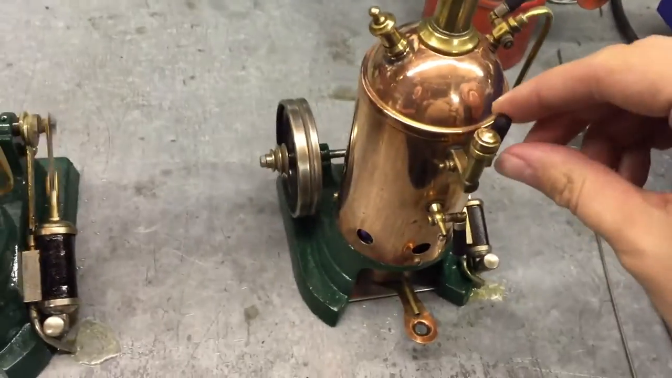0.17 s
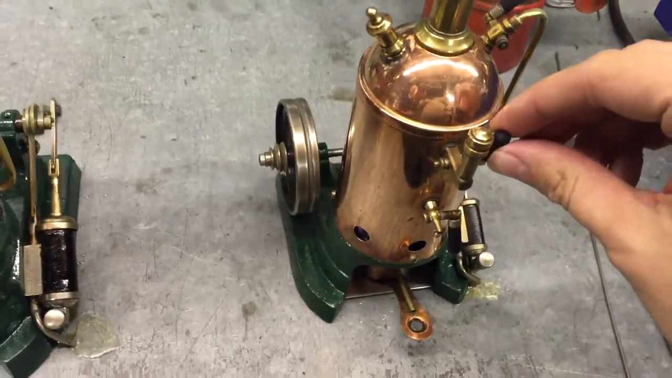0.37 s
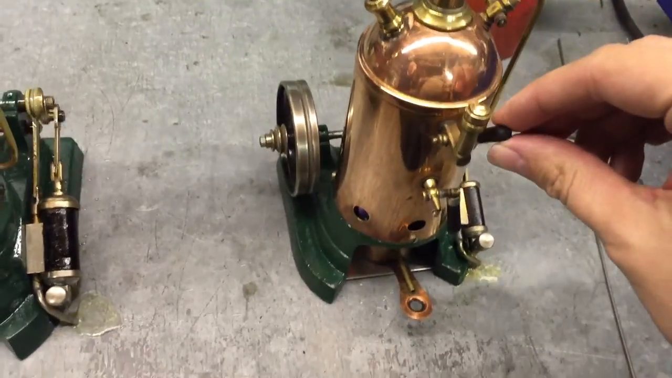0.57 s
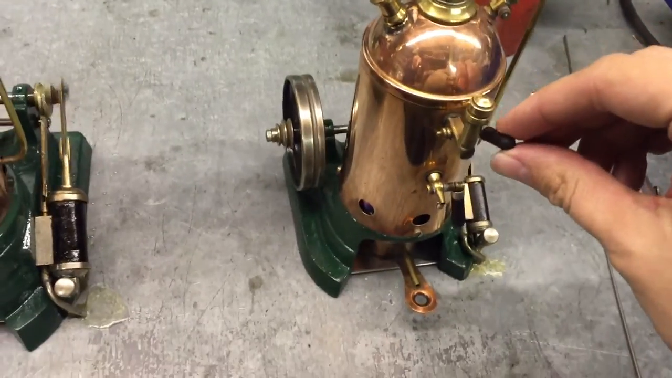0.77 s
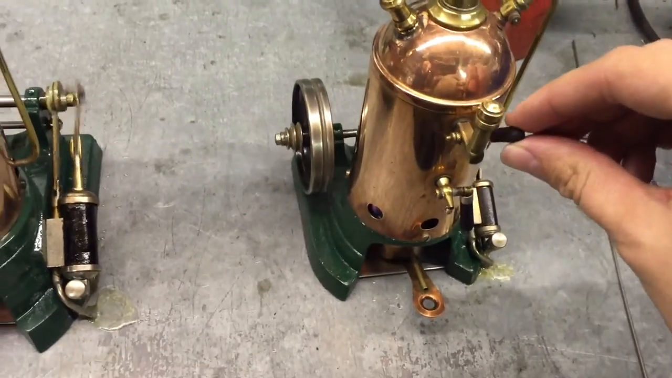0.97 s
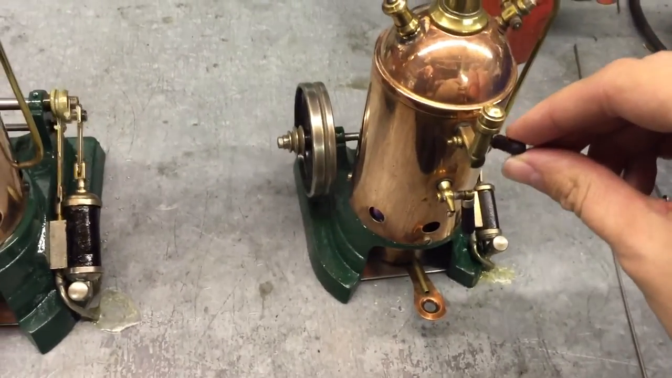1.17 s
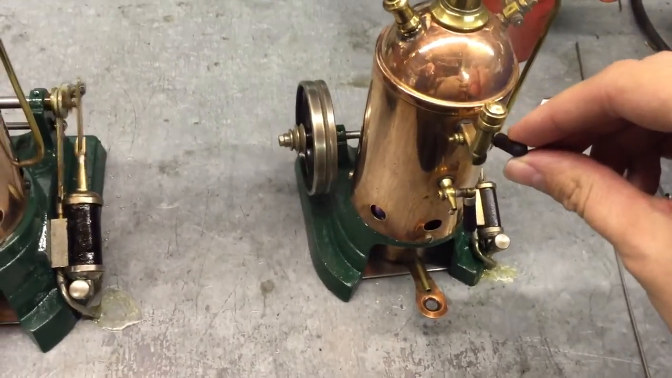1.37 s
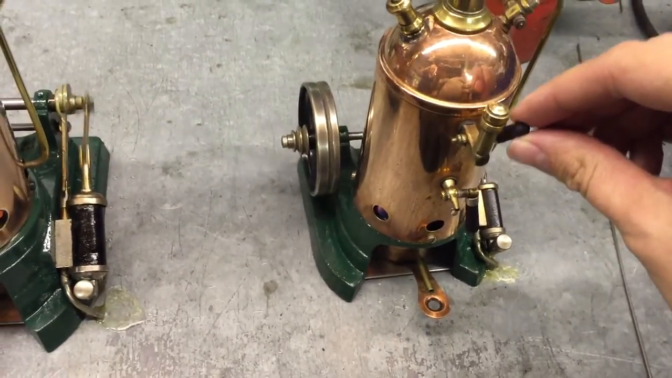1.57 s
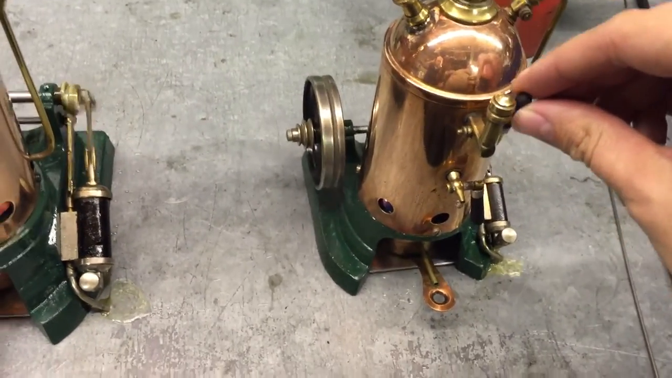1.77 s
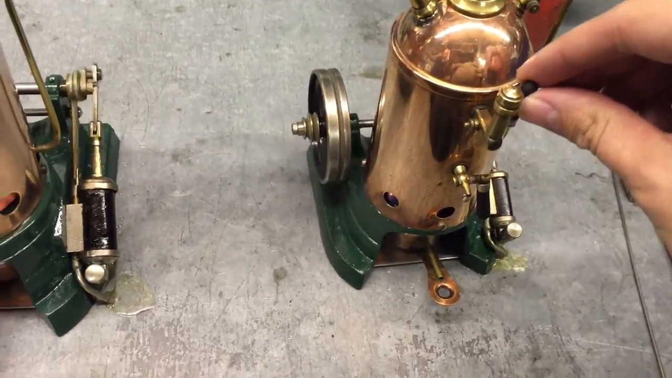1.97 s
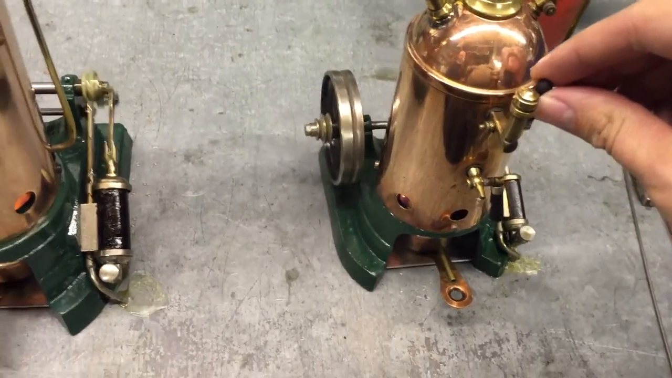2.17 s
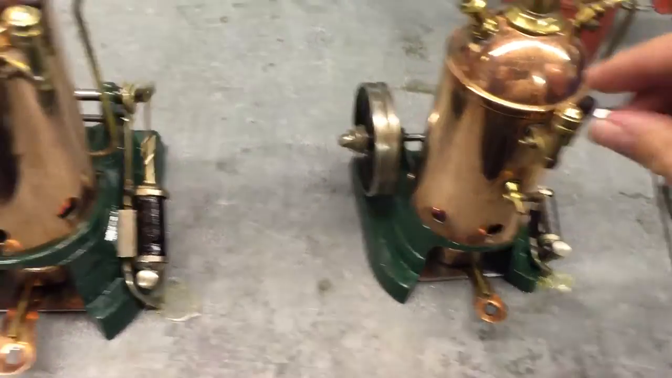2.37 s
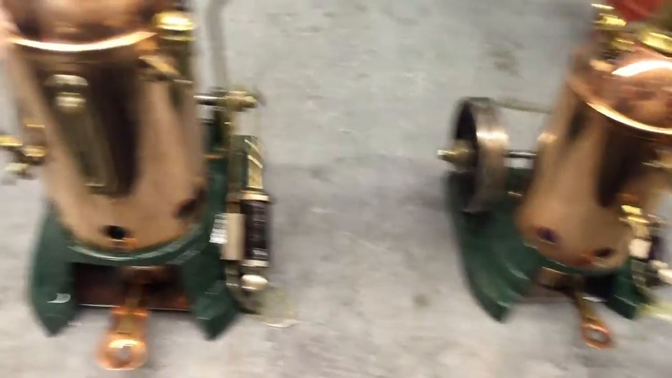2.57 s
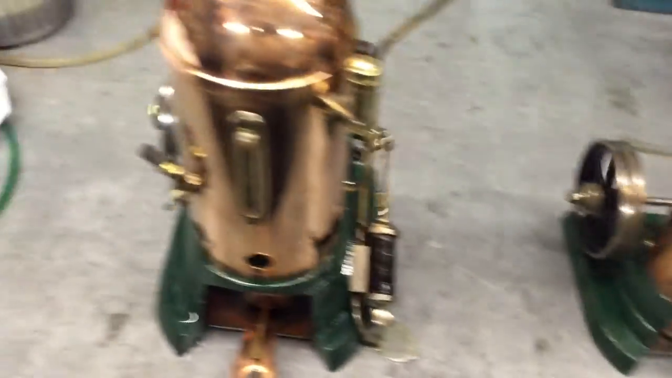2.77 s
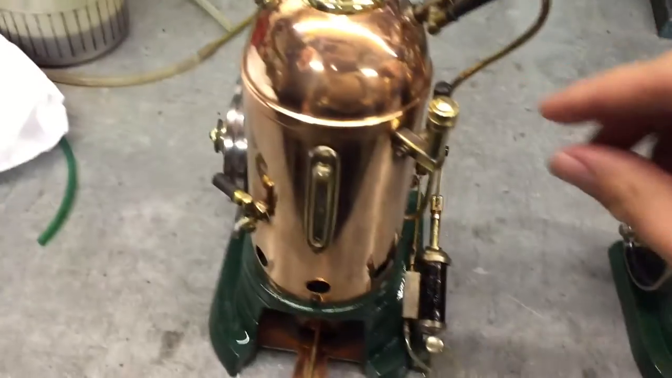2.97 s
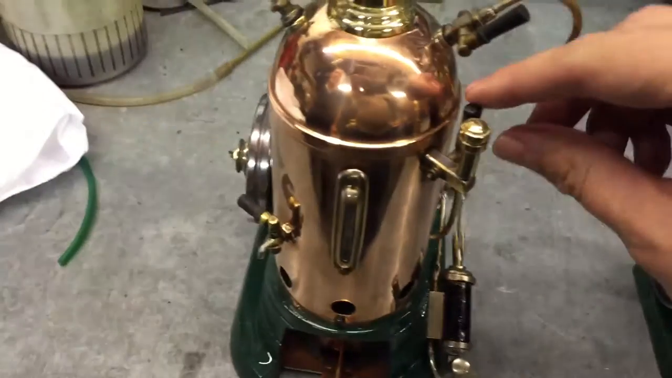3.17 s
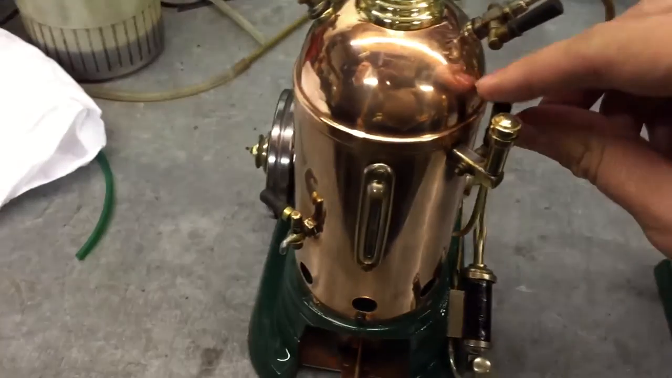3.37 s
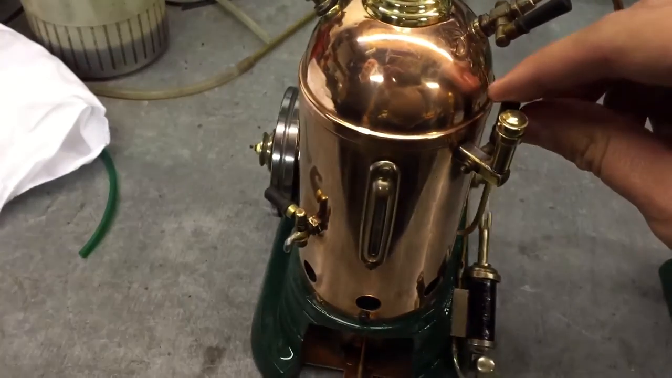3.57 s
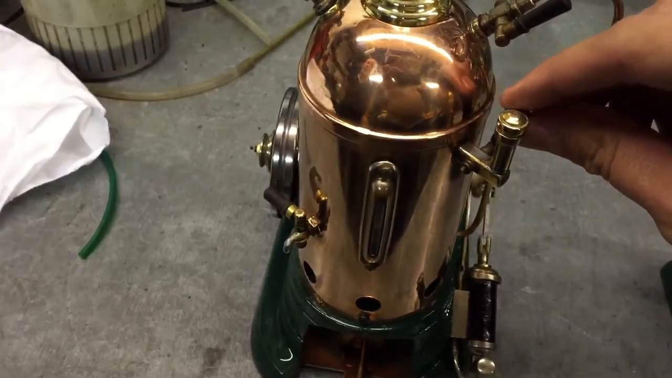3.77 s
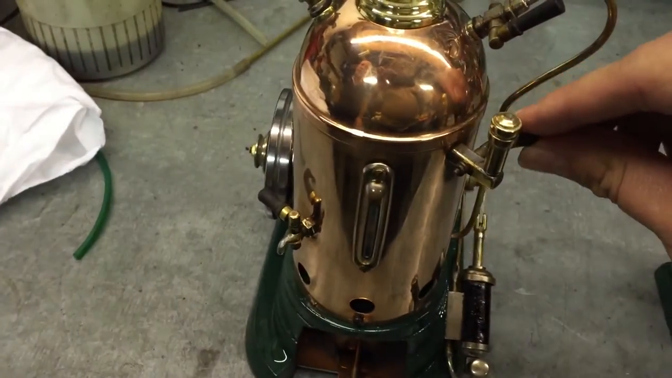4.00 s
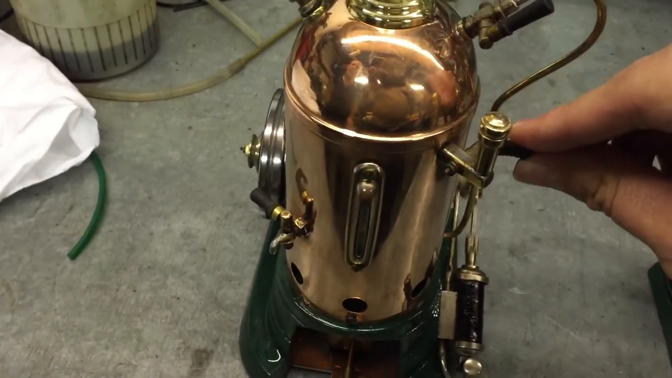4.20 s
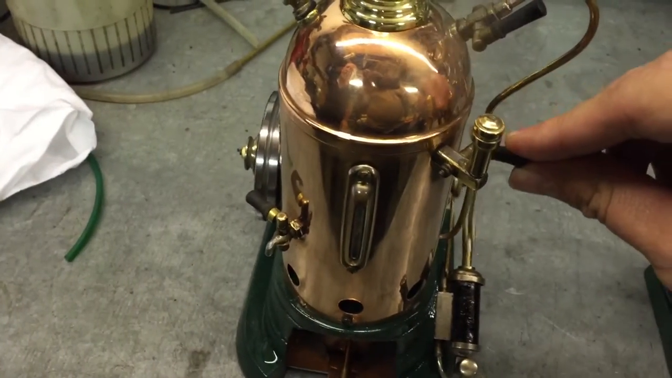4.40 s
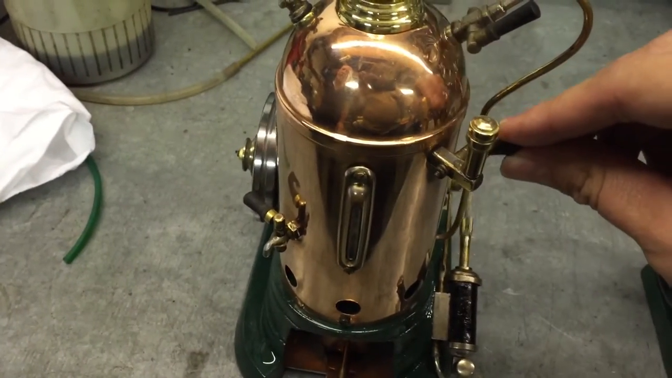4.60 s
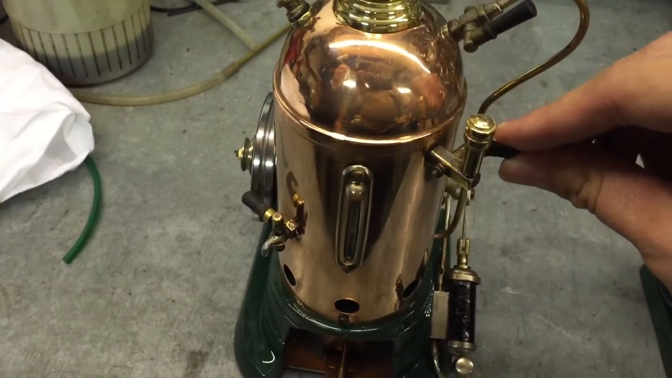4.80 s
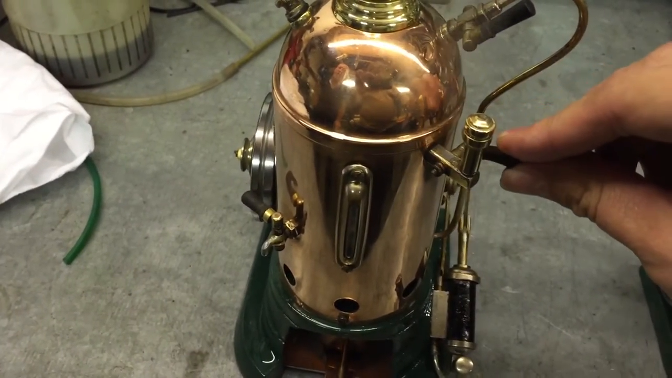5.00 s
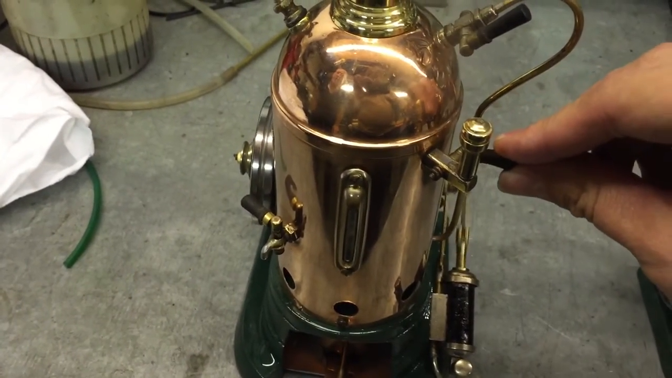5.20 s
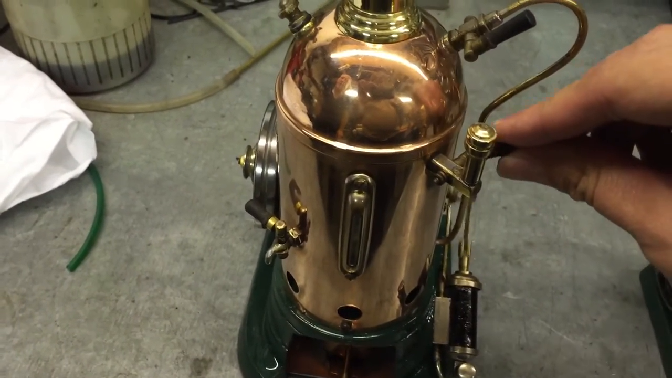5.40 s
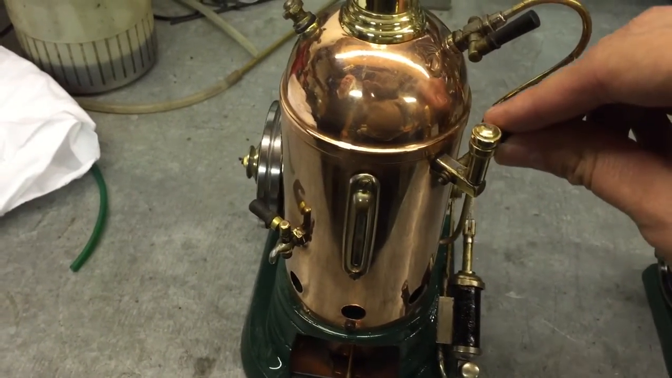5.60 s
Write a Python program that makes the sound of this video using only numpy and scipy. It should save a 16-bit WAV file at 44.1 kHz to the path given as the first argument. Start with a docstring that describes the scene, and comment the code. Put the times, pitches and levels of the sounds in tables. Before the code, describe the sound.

Close handheld phone sound of two tiny steam engines on a workshop floor: light chuffs, metal clacks, rattles, boiler simmer and airy burner hiss. Two brief piercing whistle blasts come first, then engine noise alone, then two higher, rougher blasts with steam spray and low buffeting. The background dips under the whistles and swells back; reflections are short.

```python
"""Two small model steam engines run on a workshop floor near a phone; a hand opens the whistle of one twice,
then of the other twice. Whistles are wavering sines with steam hiss around them. Each crank turn of the first
engine gives a noise puff and a clack of ringing metal; the second puffs softly. Loose parts knock and water
simmers over steady workshop noise. The phone's gain control turns the room down under the whistles and
brings it back slowly."""
import sys
import numpy as np
from scipy import signal
from scipy.fft import rfft, irfft
from scipy.io import wavfile
from scipy.ndimage import uniform_filter1d

SR = 44100
rng = np.random.default_rng(int(sys.argv[2]) if len(sys.argv) > 2 else 0)


def put_to_file(sound):
    """Save the sound as 16-bit audio at rate SR, in the file named by the first command-line argument."""
    columns = np.atleast_2d(sound).T  # one column per channel
    safe = np.clip(columns, -1, 1)
    whole_steps = np.round(safe * 32767)
    wavfile.write(sys.argv[1], SR, whole_steps.astype(np.int16))


N = 249165
TIME = np.arange(N) / SR
LIFT_DB = 11  # how far the gain control lifts quiet passages

# crank turns of the first engine: (time [s], puff level [dB], delay of the clack [ms], clack level [dB],
# level of the knock that comes with the clack [dB])
CRANK_TURNS = [(0.059, -35.5, 65.3, -31.5, -42), (0.2404, -34, 72.5, -35, -33),
               (0.4215, -37.5, 74, -33, -32), (0.611, -35, 68, -34, -29), (1.1594, -33.5, 73, -29, -20.5),
               (1.7146, -35.5, 66.5, -31.5, -27.5), (1.8928, -33, 64, -28.5, -24.5),
               (2.0755, -33.5, 66, -33, -24), (2.2568, -35, 63.7, -34.5, -24.5),
               (2.4369, -35.5, 67.5, -32, -29), (2.612, -36.5, 74.7, -32.5, -30),
               (2.7967, -41.5, 67, -28.5, -28), (2.978, -38.5, 67.4, -29, -31), (3.16, -38, 62, -38, -32),
               (3.3428, -33.5, 74.5, -35, -29), (3.521, -41.5, 68, -43, -32),
               (3.705, -40.5, 55, -41.5, -35), (3.8818, -42.5, 70, -48, -26),
               (4.0676, -40.5, 67.5, -34.5, -31), (4.2545, -41.5, 58, -52, -40),
               (4.8174, -37, 60, -38, -26.5), (5.579, -39.5, 64, -43, -42.5)]
# ringing tones of the metal base: (frequency [Hz], level [dB], time to fall by 60 dB [s])
BASE_MODES = [(866, -17.5, 0.19), (1221, -3, 0.03), (1366, -8.5, .02), (1600, -2, 0.012),
              (2041, -7.5, 0.026), (2515, 2, 0.0074), (2950, -4, 0.0028)]


def undb(db):
    """Turn decibels into an amplitude factor."""
    return 10 ** (np.asarray(db) / 20)


def unit(x):
    """Scale a signal to rms 1."""
    return x / np.sqrt(np.mean(x ** 2))


def svf(x, hz, width):
    """One resonance, gain 1 at the centre."""
    return signal.lfilter(*signal.iirpeak(hz, hz / width, fs=SR), x)


def follow(x, rise_s, fall_s, size=100):
    """Envelope that rises and falls at its own rates, worked out block by block."""
    held = [0.]
    for value in x[::size]:
        lag_s = rise_s if value > held[-1] else fall_s
        held.append(held[-1] + (value - held[-1]) * size / SR / lag_s)
    return np.interp(np.arange(N), np.arange(len(held)) * size, held)


def band(hz, width):
    """Noise in one resonance, rms 1."""
    return unit(svf(rng.standard_normal(N), hz, width))


def coloured(points):
    """Noise with a spectrum drawn through (Hz, dB) points, rms 1."""
    hz, db = np.transpose(points)
    bins = np.arange(1, N // 2 + 2) * SR / N
    gain = undb(np.interp(np.log(bins), np.log(hz), db))
    return unit(irfft(rfft(rng.standard_normal(N)) * gain, N))


def walk(rate):
    """Smooth random wander that changes about rate times a second, rms 1."""
    lowpass = signal.butter(2, rate, fs=SR, output="sos")
    return unit(signal.sosfilt(lowpass, rng.standard_normal(N)))


def played(tables):
    """Columns of several spans against time, and a gate open inside the spans."""
    s, *columns = np.transpose(np.concatenate(tables))
    gate = sum((TIME >= t[0][0]) & (TIME <= t[-1][0]) for t in tables)
    return uniform_filter1d(1. * gate, size=60), [np.interp(TIME, s, c) for c in columns]


def bursts(s, db, rise_s, t60):
    """An envelope that swells and dies at each event."""
    t = np.arange(int(SR / 5)) / SR
    shape = (1 - np.exp(-t / rise_s)) ** 2 * undb(-60 * t / t60)
    marks = np.zeros(N)
    marks[(s * SR).astype(int)] = undb(db)
    return signal.oaconvolve(marks, shape / shape.max())[:N]


def ring(x, modes, tilt_db):
    """Fading sines rung by x; tilt_db per octave favours the high ones, or the low ones if negative."""
    t = np.arange(int(SR / 5)) / SR
    body = 0
    for hz, db, t60 in modes:
        fade = undb(db + tilt_db * np.log2(hz / 1700) - 60 * t / t60)
        body = body + fade * np.sin(2 * np.pi * hz * t)
    return signal.fftconvolve(x, body)[:N]


def room(x, t60, wet_db):
    """Reflections add a short tail of fading noise."""
    t = np.arange(int(SR / 2)) / SR
    tail = rng.standard_normal(len(t)) * undb(-60 * t / t60) * (t > .004)
    return x + undb(wet_db) * signal.fftconvolve(x, tail / np.sqrt(np.sum(tail ** 2)))[:N]


def workshop_hiss():
    """Steady noise with burner and leaks, cut into bands that flicker on their own."""
    # spectrum of the noise: (frequency [Hz], relative level per Hz [dB])
    spectrum = [(60, -12.5), (110, -8), (220, -15), (326, -7.5), (450, -24.5), (596, -4), (981, -10.5),
                (1210, -8), (1840, -10.5), (3000, -14), (5250, -13.5), (7580, -13.5), (9000, -11.5),
                (11500, -16.5), (13600, -15), (15800, -21.5)]
    noise = coloured(spectrum)
    edges = (60, 400, 1500, 3200, 5500, 7600, 10400, 12500, 16500)  # Hz
    hiss = 0
    for low_hz, high_hz in zip(edges, edges[1:]):
        bandpass = signal.butter(3, (low_hz, high_hz), "band", fs=SR, output="sos")
        flicker_db = 1.6 * np.tanh(walk(22) / 2) + 3.0 * walk(4)
        hiss = hiss + signal.sosfilt(bandpass, noise) * undb(flicker_db)
    return undb(-51.5) * hiss


def deep_rumble():
    """Narrow low noise that swells now and then over a faint steady level."""
    # swells: (centre [s], level [dB], length [s])
    swell_table = [(0.115, -57.5, .1), (0.447, -61.5, 0.27), (2.27, -72, 0.13), (2.57, -65, .12),
                   (2.95, -67.5, 0.34), (3.35, -63, .3), (4.054, -63, .35)]
    swells = undb(-71)
    for s, db, length in swell_table:
        swells = swells + undb(db) * np.exp(-(2 * (TIME - s) / length) ** 2)
    return swells * unit(svf(band(58, 27), 48, 35))


def dull_thumps():
    """Thumps near the phone: short bursts of low noise."""
    # (time [s], level [dB])
    thump_table = [(0.349, -43.5), (0.521, -44), (0.628, -52)]
    s, db = np.transpose(thump_table)
    return bursts(s, db - 8.0, 0.0026, 0.146) * (band(84, 44) + band(370, 95))


def simmering():
    """Boiler water stirs each mode of the metal on its own, in short uneven fits."""
    # the simmering swells and sinks: (time [s], level [dB])
    swell_table = [(0, -53), (.7, -49), (2.0, -49), (2.9, -51), (3.8, -56), (4.8, -49.5), (5.65, -63)]
    chatter = 0
    for mode in BASE_MODES:
        fits_db = 15 * np.tanh(walk(33) / 2) + 4.32 * walk(140)
        chatter = chatter + ring(rng.standard_normal(N) * undb(fits_db), [mode], 0)
    return undb(np.interp(TIME, *np.transpose(swell_table))) * unit(chatter)


def exhaust_puffs():
    """Each puff is a quick burst of pipe-coloured noise and a slower burst of broad hiss."""
    # broad hiss: (frequency [Hz], relative level per Hz [dB])
    puff_spectrum = [(900, -13), (2000, -1), (5000, -2), (8500, -5.5), (11500, -11), (13500, -7.5),
                     (15500, -5)]
    # resonances of the exhaust: (frequency [Hz], width [Hz], relative level [dB])
    pipe_modes = [(9470, 900, 8.5), (8800, 170, -5.5), (13400, 1500, -14.5)]
    turn_s, puff_db, *_ = np.transpose(CRANK_TURNS)
    # the second engine puffs softly and evenly, weaker until the phone comes nearer
    second_s = 3.091 + .147 * np.arange(-20, 17)
    phone_moves_s, phone_arrives_s, far_db = 1.2, 3.1, -8
    distance_db = np.interp(second_s, (phone_moves_s, phone_arrives_s), (far_db, 0))
    second_db = -44.5 + distance_db + 2 * rng.standard_normal(len(second_s))
    s = np.r_[turn_s, second_s]
    db = np.r_[puff_db, second_db]
    broad_db = np.r_[puff_db - 4, second_db - 0.5]
    pipe = unit(sum(undb(d) * band(f, w) for f, w, d in pipe_modes))
    quick = bursts(s - .005, db - 4, 0.0036, 0.033) * pipe
    slow = bursts(s - .006, broad_db - 2.5, 0.032, 0.066)
    return quick + slow * coloured(puff_spectrum) * undb(2.0 * walk(200))


def loose_knocks(rattle):
    """Loose parts hit the base: short rattles ring its modes."""
    # (time [s], level [dB])
    knock_table = [(0.058, -28), (0.112, -31), (0.613, -37), (0.628, -25.5), (1.626, -25), (1.773, -22),
                   (1.919, -26), (2.081, -38), (2.161, -39.5), (2.248, -35), (2.488, -31), (2.642, -23.5),
                   (2.667, -26.5), (2.926, -27), (3.016, -34), (3.343, -28), (3.52, -22.5), (3.704, -34),
                   (3.618, -38), (3.669, -38), (3.903, -33.5), (4.075, -31.5), (4.239, -30.5),
                   (4.282, -29.5)]
    s, db = np.transpose(knock_table)
    turn_s, _, lag_ms, _, turn_knock_db = np.transpose(CRANK_TURNS)
    faint = rng.random((20, 2))  # faint knocks at random times and levels
    s = np.r_[s, turn_s + lag_ms / 1000, faint[:, 0] * TIME[-1]]
    db = np.r_[db, turn_knock_db, -46 + 5 * (2 * faint[:, 1] - 1)]
    hits = bursts(np.maximum(s - .001, 0), db - 38.5, 0.00064, 0.03) * rattle
    # tilted down and up, so both ends of the spectrum gain
    return ring(hits, BASE_MODES, -6) + ring(hits, BASE_MODES, 6)


def rod_clacks(rattle):
    """After each puff the rod clacks: a short rattle rings metal modes, with a tick of treble noise."""
    # (frequency [Hz], level [dB], time to fall by 60 dB [s])
    rod_modes = [(4570, -9.5, 0.022), (4460, -0.5, .009), (5180, -4, 0.015), (4040, -6, 0.01),
                 (5870, -18.5, 0.03), (3630, -12.5, 0.033)]
    turn_s, _, lag_ms, clack_db, _ = np.transpose(CRANK_TURNS)
    clack_s = turn_s + lag_ms / 1000
    metal = ring(bursts(clack_s - .002, clack_db - 20, 0.0039, 0.013) * rattle, rod_modes, 0)
    treble = bursts(clack_s, clack_db - 8.5, 0.00046, 0.012) * band(9900, 9000)
    return metal + treble


def dry_snaps():
    """Sharp dry snaps: a tiny click rings modes that die within milliseconds."""
    # (time [s], level [dB])
    snap_table = [(.755, -20), (2.0806, -21), (3.5192, -24), (4.2383, -26), (4.336, -32), (4.872, -21)]
    # (frequency [Hz], level [dB], time to fall by 60 dB [s])
    snap_modes = [(9000, 0, .003), (12500, -7, .002), (4500, -6, .004), (1800, -10, .006)]
    s, db = np.transpose(snap_table)
    return ring(bursts(s, db - 6, .00002, .0002), snap_modes, 0)


def engines():
    """All engine parts but the whistles; small parts radiate no bass, so a high-pass removes it."""
    rattle = rng.standard_normal(N) * undb(3.1 * walk(480))
    parts = simmering() + exhaust_puffs() + loose_knocks(rattle) + rod_clacks(rattle) + dry_snaps()
    return signal.sosfilt(signal.butter(4, 560, "high", fs=SR, output="sos"), parts)


def steam(tube, sings):
    """Jet hiss, spitting and breath tuned to the tube crackle with droplets; a jet at the phone buffets it."""
    # one list per opening of the valve: (time [s], jet hiss level [dB])
    valve_openings = [
        [(.72, -77.5), (.756, -52.5), (.803, -43.5), (.81, -36), (.826, -32), (.852, -38), (.992, -43.5),
         (1.06, -55.5)],
        [(1.19, -69.5), (1.208, -50.5), (1.266, -48.5), (1.3, -37), (1.352, -38), (1.446, -45), (1.5, -44),
         (1.576, -49), (1.62, -62)],
        [(4.24, -92.5), (4.256, -72), (4.33, -48), (4.36, -40.5), (4.385, -31.5), (4.472, -32.5), (4.584, -35),
         (4.656, -49.5), (4.7, -61.5)],
        [(4.84, -65), (4.888, -53.5), (4.942, -41.5), (4.99, -35.5), (5.036, -28), (5.12, -38), (5.228, -43.5),
         (5.386, -55.5), (5.442, -59.5), (5.48, -63)],
    ]
    # each opening, against its jet: (breath in the silent tube [dB], breath once it sings [dB],
    # spitting [dB], buffeting [dB])
    opening_levels = [(9.5, 2, -3.5, -59.5), (5, -1.5, -2.5, -61), (-0.5, 6, -3.5, -31), (9, 7, -6, -21)]
    # jet hiss: (frequency [Hz], relative level per Hz [dB])
    jet_spectrum = [(3000, -24.5), (6000, 4), (8500, 0), (10300, -1), (11500, -6.5), (12800, -8),
                    (15000, -4.5)]
    gate, (db,) = played(valve_openings)
    opening = np.searchsorted([table[0][0] for table in valve_openings[1:]], TIME)
    silent_db, singing_db, spit_db, buffet_db = np.array(opening_levels)[opening].T
    sung = follow(sings, 0.011, .04)
    # spitting sinks and sputtering stops once the tube sings
    sputter_db = 1.5 * (1 - sung) * walk(60)
    crackle = undb(2.0 * walk(120) + 2.0 * walk(18) + sputter_db)
    spit = undb(spit_db - 13 * sung) * unit(svf(band(1700, 1700), 1700, 2600))
    breath_db = silent_db + (singing_db - silent_db) * sung
    breath = (walk(550) * np.cos(tube) + walk(740) * np.sin(tube)) * undb(1.8 * walk(140))
    hiss = coloured(jet_spectrum) + spit + undb(breath_db) * breath
    gust = follow(gate * undb(db + buffet_db) * sings, .035, 0.18) * sung
    buffet = undb(1.7 * walk(22)) * unit(svf(band(120, 130), 89, 180))
    deep_buffet = undb(-2.5) * unit(svf(band(65, 25), 65, 40))
    return gate * undb(db) * crackle * hiss + gust * (buffet + deep_buffet)


def whistle():
    """A near sine wavers with wet steam; returns tone, tube phase for the breath, and how fully it sings."""
    # one list per blast: (time [s], pitch [Hz], level before chokes and roughness [dB])
    blasts = [
        [(.807, 4373, -13), (.825, 4398, -7), (.855, 4475, -7), (.895, 4336, -7.5), (.92, 4447, -9.5),
         (.955, 4440, -7.5), (.987, 4260, -11.5), (1.01, 4020, -24.5), (1.03, 3200, -43)],
        [(1.268, 3405, -36), (1.287, 4200, -16), (1.297, 4280, -9.5), (1.312, 4260, -8.5), (1.32, 4474, -5.5),
         (1.36, 4530, -5.5), (1.43, 4506, -9), (1.45, 4520, -12.5), (1.48, 4536, -9), (1.52, 4480, -11.5),
         (1.548, 4336, -15.5), (1.565, 3990, -27.5), (1.583, 3250, -41.5)],
        [(4.345, 3600, -47.5), (4.355, 4300, -38.5), (4.374, 5617, -36), (4.377, 5677, -8.5), (4.4, 5600, -5.5),
         (4.44, 5554, -7), (4.494, 5473, -9), (4.515, 5575, -8), (4.565, 5460, -8.5), (4.605, 5306, -13.5),
         (4.64, 5163, -18), (4.657, 4900, -38)],
        [(4.92, 4750, -35.5), (4.932, 4960, -19.5), (4.948, 5230, -10), (4.971, 4930, -10.5),
         (4.979, 5156, -14), (4.986, 5357, -30)],
        [(5.028, 5810, -24), (5.034, 5780, -6), (5.06, 5727, -4.5), (5.12, 5668, -8), (5.16, 5786, -8),
         (5.25, 5710, -12), (5.35, 5750, -10.5), (5.41, 5477, -15), (5.436, 5285, -19), (5.453, 4950, -36.5)],
    ]
    # wetness of each blast: (roughness at the start [0-1], roughness once the tube has blown dry [0-1],
    # drying time [s])
    wetness = [(0.47, .17, .04), (.45, 0.035, 0.094), (1, 0.283, 0.068), (0.5, 0.32, .02),
               (0.55, .17, 0.033)]
    # drops of water choke the tone: (centre [s], length [ms], depth [dB])
    chokes = [(0.813, 1.1, 7), (0.835, 2.8, 9.5), (0.946, 2.7, 7.5), (0.973, 4.6, 4), (1.313, 3, 4.5),
              (1.351, 5.7, 6.5), (1.511, 6.8, 3), (1.528, 3.5, 5.5), (4.3815, 1.86, 6), (4.387, 3.2, 6.5),
              (4.4075, 4.16, 20), (4.423, 6.5, 14), (4.498, 8.4, 22), (4.512, 1.8, 17), (4.4544, 5.7, 5),
              (4.5738, 5.2, 18), (4.931, 2.56, 9), (4.974, 1.56, 12), (4.9777, 2.4, 8), (5.0388, 3.0, 9.5),
              (5.056, 4.7, 15), (5.0722, 3.8, 12), (5.089, 4.1, 17), (5.1073, 3.3, 10), (5.1505, 2.2, 12)]
    # overtones: (multiple of the pitch, low whistle's level [dB], high whistle's level [dB])
    overtones = [(2, -38.5, -38), (3, -37.5, -65)]
    gate, (hz, db) = played(blasts)
    hz = uniform_filter1d(hz, size=300)  # the pitch bends, it does not turn corners
    low_whistle = TIME < 3
    full_db = -12
    rough = 0.05 * np.maximum(full_db - db, 0)  # a tone weaker than full is rougher
    for blast, (wet, dried, drying_s) in zip(blasts, wetness):
        t = TIME - blast[0][0]
        inside = (t >= 0) * (TIME <= blast[-1][0])
        rough += inside * (dried + (wet - dried) * np.exp(-np.abs(t) / drying_s))
    rough = np.clip(rough, 0, 1)
    sings = gate * np.clip(undb(db - full_db + 9.5), 0, 1)
    # breath sits between the sung pitch and the tube's own resonance
    tube_hz = .4 * hz + 0.61 * np.where(low_whistle, 4600, 5500)
    tube = np.cumsum(tube_hz) * 2 * np.pi / SR
    for s, ms, depth_db in chokes:
        near = slice(int((s - .02) * SR), int((s + .08) * SR))
        t = TIME[near] - s
        db[near] -= depth_db * np.exp(-(t * 2000 / ms) ** 4)
        # in a full blast of the high whistle the pitch starts high after a choke and settles
        overshoots = 4 < s < 4.9 or s > 5
        hz[near] += 9 * depth_db * overshoots * (t > 0) * np.exp(-np.abs(t) / 0.0092)
    waver = rough * (0.017 * walk(130) + 0.023 * walk(470))
    phase = np.cumsum(hz * (1 + waver)) * 2 * np.pi / SR
    tone = np.sin(phase)
    # the third harmonic grows faster than the tone; all overtones blur with the wetness
    for k, low_db, high_db in overtones:
        growth_db = .8 * (k - 2) * (db + 10.5)
        overtone_db = np.where(low_whistle, low_db, high_db) + growth_db + 2.1 * walk(150)
        blur = (0.34 + 2.0 * rough) * walk(250)
        tone = tone + undb(overtone_db) * np.sin(k * phase + blur)
    flutter_db = rough * (4.6 * np.abs(walk(67)) + 2.7 * np.abs(walk(350)) - 4.5)
    return np.sqrt(2) * tone * gate * undb(db - flutter_db), tube, sings


def scene():
    """Whistles and steam over engines and workshop, which are set low for the gain control to lift."""
    tone, tube, sings = whistle()
    workshop = workshop_hiss() + deep_rumble() + dull_thumps()
    quiet = undb(-LIFT_DB) * (room(engines(), 0.07, -10.5) + workshop)
    return (room(tone + steam(tube, sings), 0.18, -17.5) + quiet)[None]


def record(dry):
    """Gain control lifts quiet passages, drops fast under loud ones, recovers slowly; the port colours treble."""
    # notches of the phone's sound port: (frequency [Hz], width [Hz])
    port_notches = [(10360, 700), (7610, 360)]
    loud = np.clip(uniform_filter1d(np.abs(dry[0]), size=200) / 0.041, 0, 1)
    held = follow(follow(loud, 0.0026, 0.18), 0.0044, 0.14)
    x = dry * undb(LIFT_DB * (1 - held))
    for hz, width in port_notches:
        x = x - 0.76 * svf(x, hz, width)
    # nothing is heard above 15450 Hz
    lowpass = signal.ellip(14, .2, 95, 15450, fs=SR, output="sos")
    return signal.sosfilt(lowpass, np.clip(x, -1, 1))


dry = scene()
out = record(dry)
put_to_file(out)
```